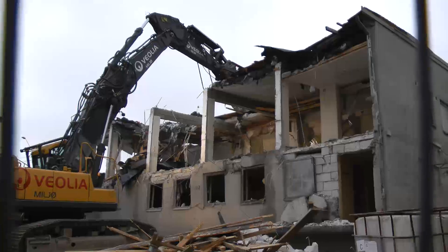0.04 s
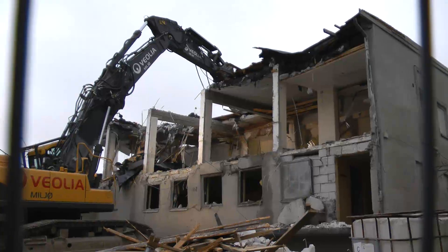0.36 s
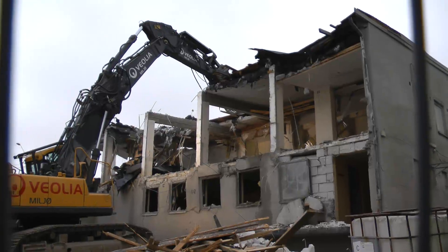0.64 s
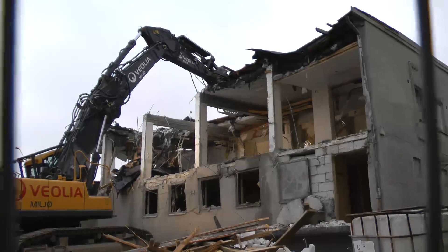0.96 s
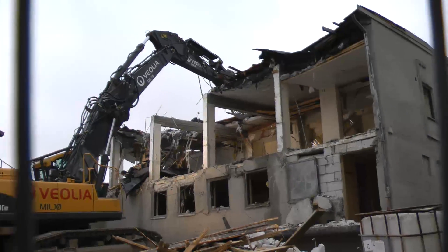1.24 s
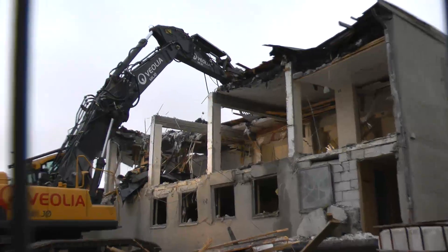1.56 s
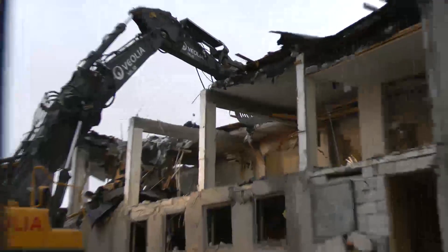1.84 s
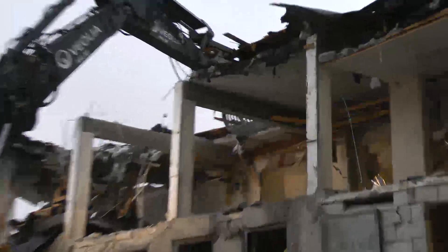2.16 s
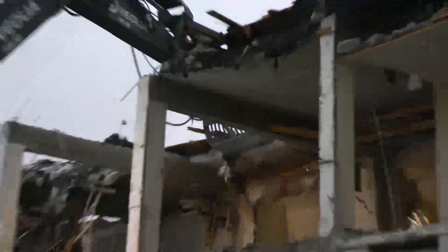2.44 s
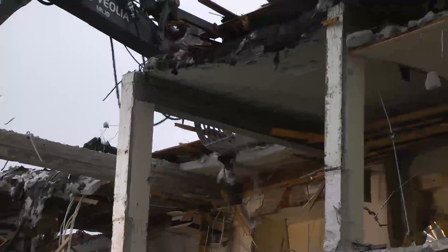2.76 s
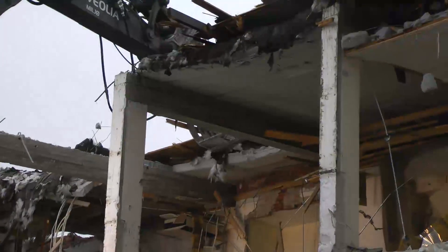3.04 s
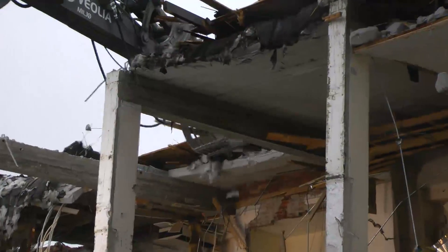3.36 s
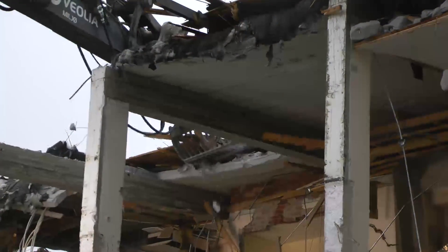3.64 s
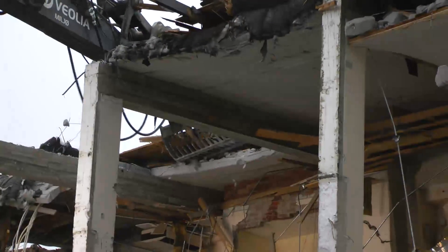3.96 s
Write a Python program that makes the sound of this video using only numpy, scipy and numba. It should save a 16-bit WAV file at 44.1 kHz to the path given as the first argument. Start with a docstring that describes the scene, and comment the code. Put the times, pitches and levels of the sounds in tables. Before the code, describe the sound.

An excavator runs steadily at an outdoor demolition site, its diesel droning under howling, hissing hydraulics. Fine grit starts to trickle, then roof timber snaps in a quick run of sharp cracks with a short echo.

```python
"""A demolition excavator works at steady revs from the start: a six-cylinder diesel drones and booms,
its hydraulic pump howls, fan tones waver and oil sings in two valves over a broad hiss.
From about 2 s, fine grit trickles ever thicker from the roof. At 2.7 s the roof timber starts to snap
in a short run of cracks; the loudest, at 3.2 s, makes a gain control duck the mix and recover.
One last small crack comes at 3.8 s while the machine runs on."""
import sys
import numpy as np
from scipy import signal
from scipy.fft import rfft, irfft
from scipy.io import wavfile
from scipy.ndimage import uniform_filter1d
from numba import njit

SR = 44100
rng = np.random.default_rng(int(sys.argv[2]) if len(sys.argv) > 2 else 0)


def to_wav(sig):
    """Store sig (one row per channel, or 1-D mono) as 16-bit WAV at the path in sys.argv[1].

    Samples outside -1..1 are clipped; the rate is SR.
    """
    pcm = np.clip(np.atleast_2d(sig), -1, 1) * 32767
    pcm = np.round(pcm).astype(np.int16)
    wavfile.write(sys.argv[1], SR, pcm.T)  # frames by channels


N = 176400

# Levels are relative within a layer; a positive pan_db leans left.
# The machine's stereo balance: frequency_hz, pan_db
STEREO_PAN = [(60, -1), (110, -2), (200, -4.5), (380, 1), (700, 7), (1290, 2.5), (2380, 10), (4400, 4),
              (8120, 5.5), (15000, -2)]
# How alike its two sides sound: frequency_hz, likeness_0_to_1
STEREO_LIKENESS = [(25, .2), (65, 0.92), (250, 0.8), (600, 0.74), (1000, 0.36), (1500, 0.5), (2800, 0.46),
                   (5500, 0.92), (9000, 0.83), (14000, 0.98)]
# How far its left side leads: frequency_hz, lead_rad
STEREO_LEAD = [(100, 0.34), (1000, 0.72), (2300, 0.66), (3800, 0.64), (4400, 0.67), (7000, -0.7),
               (8500, -1), (9700, -3), (11000, -6), (14000, 0.2)]
# The diesel's firing rate, sagging under load: time_s, rate_hz
FIRING_RATE = [(0, 84.2), (.45, 84.6), (.68, 84.35), (.9, 83.45), (1.17, 84.15), (1.47, 83.8), (1.78, 84.2),
               (2.02, 85.05), (2.25, 83.9), (2.57, 83.45), (2.9, 84.35), (3.15, 84.15), (3.45, 83.85),
               (3.88, 84.25), (4, 83.9)]
# Tone colour of rumble and clatter: frequency_hz, level_db
RUMBLE_COLOUR = [(25, -41), (45, -24), (62, -15), (80, 2.5), (135, -2), (200, 0.5), (320, -1), (430, -5),
                 (650, -5), (900, -8.5), (1200, -10), (1700, -13.5), (2600, -19), (5000, -79)]
# Engine and pump harmonics: multiple_of_cycle_rate
HARMONICS = [6, 12, 13, 22, 24, 28, 32, 42, 44, 54, 60, 63, 72, 90]
# The mix of those harmonics, row for row: level_db, pan_db
HARMONIC_MIX = [(-42, -4), (-31, -0.5), (-41.5, -4), (-45, 9), (-42, -5), (-42, 10), (-45.5, 4), (-43, -6),
                (-45.5, 2), (-41.5, -0.5), (-51.5, 6), (-51.5, 14), (-48.5, 13), (-49, 12)]
# Fader on the whole diesel drone: time_s, level_db
DRONE_FADER = [(0, 2), (1.2, -0.5), (2.0, 0), (2.8, -1.5), (3.4, -1.5), (4, -0.3)]
# Fader on the exhaust boom: time_s, level_db
BOOM_FADER = [(0, -41), (.3, -26.5), (.8, -29), (1.7, -28.5), (2.1, -31.5), (2.6, -30), (3.1, -32.5),
              (3.6, -35), (4, -33)]
# Swells of the pump's howl: time_s, level_db
HOWL_FADER = [(0, -33), (.3, -38.5), (.55, -32), (.76, -29), (.87, -22), (1.02, -25.5), (1.08, -47),
              (1.14, -29.5), (1.43, -24), (1.7, -31.5), (1.84, -27.5), (2.08, -29), (2.45, -26),
              (2.74, -24.5), (2.9, -31), (3.15, -31), (3.35, -26.5), (3.53, -25), (3.9, -28), (4.0, -31)]
# The pump's hum, an octave under the howl: time_s, level_db
HUM_FADER = [(0, -27), (.6, -39.5), (.85, -46), (1.2, -34), (1.6, -45), (3, -39), (4, -38)]
# Fan and auxiliary drive tones: pitch_hz, level_db
FAN_TONES = [(109.5, -40), (136, -38.5), (328.4, -38.5), (358.5, -44.5), (548, -49.5), (2303, -54),
             (3053, -53.5)]
# Tone colour of the hiss: frequency_hz, level_db
HISS_COLOUR = [(700, -17.5), (1500, -12.5), (1950, -7.5), (2250, -0.24), (3200, 1.5), (4200, -0.2),
               (4800, 0.5), (5900, 0.2), (6650, 0.4), (7250, -4), (7700, -5), (8300, -10.5), (9400, -5.5),
               (9900, -17.5), (10700, -32.5), (14500, -21), (16000, -42)]
# Fader on the hiss: time_s, level_db
HISS_FADER = [(0, 1.5), (.6, 2.5), (.9, 0.7), (1.4, 1.5), (2.4, 1.5), (2.9, 1.4), (3.5, 2.2), (4, 1.5)]
# The lower valve note, rising: time_s, pitch_hz, level_db
RISING_VALVE = [(0, 2800, -31), (.6, 2975, -42), (1.0, 3050, -38), (1.35, 3380, -32), (2.3, 3320, -36),
                (2.9, 3214, -36), (3.5, 3400, -34), (4, 3390, -37)]
# The upper valve note, sinking and swelling: time_s, pitch_hz, level_db
SINKING_VALVE = [(0, 5880, -49), (1.1, 5900, -35), (1.55, 5645, -35), (2.3, 5850, -39), (2.85, 5630, -31),
                 (3.3, 5580, -34), (3.75, 5440, -30.5), (4, 5500, -31)]
# Grit building as the roof gives way: time_s, level_db
GRIT_FADER = [(0, -80), (2.1, -53), (2.8, -44), (3.3, -42), (3.6, -46), (3.92, -39), (4, -36)]
# Cue list of timber snaps: start_s, level_db, thick_wood_db, brightness_db, pitch_ratio
SNAP_CUES = [(2.694, -27, 1, -8, 0.96), (3.054, -16, 4.5, -6, 1.02), (3.1225, -18, 5, -3, 1.04),
             (3.2076, -7.5, -0.5, -6.5, 0.976), (3.263, -14, -4, -8, 0.98), (3.289, -16, 2, -3, 1.027),
             (3.335, -20, -2, 0, 0.84), (3.771, -23, 1, -6, 0.98)]
# The stages in which each snap tears: delay_s, level_db, knock_db, splinters_db
TEAR_STAGES = [(0, 1, -7, 2), (.0015, 3, 2.5, -11), (.0036, 3.5, 0, -7), (.0085, -0.5, 1.5, 2),
               (.0158, -7, 0, 10)]
# The wood's ring, before each snap retunes it: pitch_hz, level_db, t60_s
WOOD_MODES = [(480, -5, 0.023), (741, -4, 0.045), (805, -2.5, 0.029), (1060, -10.5, 0.017),
              (1410, -0.5, 0.015), (1650, -13, 0.011), (2020, -2.5, 0.024), (2410, 0.5, 0.011),
              (2726, 2.5, 0.017), (3600, -1, 0.012), (5200, -1, 0.0087)]

CYLINDERS, PUMP_PULSES = 6, 36  # firings and piston pulses in one two-turn engine cycle


def undb(db):
    """Decibels to gain."""
    return 10 ** (np.asarray(db) / 20)


def unit(x):
    """Scale to rms 1."""
    return x / np.sqrt(np.mean(x ** 2))


def curve(rows):
    """An automation curve at every sample."""
    return np.interp(np.arange(N) / SR, *np.array(rows).T)


def bins():
    """Frequencies of the spectrum in Hz, floored at 1."""
    return np.maximum(np.arange(N // 2 + 1) * SR / N, 1)


def across(rows):
    """A table drawn across the spectrum on a log-frequency axis."""
    hz, value = np.array(rows).T
    return np.interp(np.log(bins()), np.log(hz), value)


def drift(rate_hz):
    """Smooth random modulation of rms 1."""
    spectrum = rfft(rng.standard_normal(N)) * np.exp(-(bins() / rate_hz) ** 2)
    spectrum[0] = 0
    return unit(irfft(spectrum, N))


def noise():
    """Two unrelated white noises."""
    return rng.standard_normal((2, N))


def low_cut(x, hz):
    """Roll off the lows at 12 dB an octave."""
    return signal.sosfilt(signal.butter(2, hz, "high", fs=SR, output="sos"), x)


def pan(x, db):
    """Place a sound between left and right."""
    return x * undb(np.array([[db], [-db]]) / 2)


def spread(sounds, colour_db):
    """Colour a direct and a scattered sound and give them the machine's stereo image, at rms 1."""
    direct, scattered = rfft(sounds) * undb(colour_db)
    alike = np.clip(across(STEREO_LIKENESS), 0, 1)
    sides = np.array([[1], [-1]])
    pair = direct * np.sqrt(1 + alike) + sides * scattered * np.sqrt(1 - alike)
    panned = pair * undb(sides * across(STEREO_PAN) / 2)
    return unit(irfft(panned * np.exp(.5j * sides * across(STEREO_LEAD)), N))


def diesel(cycle, clatter_db=-32, rumble_db=-27.5, throb=0.14, waver_db=1.5, wobble_rad=0.3):
    """Clatter loops every engine cycle, exhaust rumble pulses with the firings, harmonics drone."""
    grid = np.arange(4096) / 4096
    clatter = np.array([np.interp(cycle % 1, grid, rng.standard_normal(len(grid))) for _ in range(2)])
    colour = across(RUMBLE_COLOUR)
    drone = undb(clatter_db) * spread(clatter * undb(waver_db * drift(6.3)), colour)
    firing = np.cos(2 * np.pi * CYLINDERS * cycle)
    drone += undb(rumble_db) * spread(noise() * (1 + throb * firing), colour)
    for multiple, (level_db, pan_db) in zip(HARMONICS, HARMONIC_MIX):
        phase = 2 * np.pi * (multiple * cycle + rng.random()) + wobble_rad * drift(7.8)
        tone = np.sqrt(2) * np.sin(phase)
        drone += pan(tone * undb(level_db + waver_db * drift(10.2)), pan_db)
    return drone * undb(curve(DRONE_FADER))


def exhaust_boom(cycle, pitch_hz=151.3, width_hz=66, throb=0.51, surge_db=1.5):
    """Exhaust puffs ring the muffler's low resonance in uneven surges."""
    muffler_db = -20 * np.log10(1 + (2 * (bins() - pitch_hz) / width_hz) ** 4)
    puffs = noise() * (1 + throb * np.cos(2 * np.pi * CYLINDERS * cycle))
    surging = spread(puffs, muffler_db) * undb(surge_db * drift(12))
    return unit(surging) * undb(curve(BOOM_FADER))


def hydraulic_pump(cycle, howl_trim_db=2, howl_pan_db=3, howl_flutter_db=0.4, hum_flutter_db=2):
    """The pump's piston ripple hums and howls, swelling with the pressure."""
    phase = 2 * np.pi * PUMP_PULSES * cycle
    howl = np.sin(phase) * undb(curve(HOWL_FADER) + howl_trim_db + howl_flutter_db * drift(22))
    hum = np.sin(phase / 2 + 2 * np.pi * rng.random())
    hum *= undb(curve(HUM_FADER) + hum_flutter_db * drift(25))
    return np.sqrt(2) * (pan(howl, howl_pan_db) + hum)


def fan(detune=0.0041, waver_db=3):
    """The cooling fan and auxiliary drives spin out tones that waver in pitch and level."""
    tones = 0
    for pitch_hz, level_db in FAN_TONES:
        turns = np.cumsum(pitch_hz * (1 + detune * drift(8.7))) / SR
        tone = np.sqrt(2) * np.sin(2 * np.pi * (turns + rng.random()))
        tone *= undb(level_db + waver_db * drift(3.6))
        tones += pan(tone, np.interp(pitch_hz, *np.array(STEREO_PAN).T))
    return tones


def hiss(trim_db=-23.5, flicker_db=.5, ripple_db=1.7):
    """A broad bed of rushing air and oil, its spectrum rippled by reflections."""
    ripple = unit(uniform_filter1d(rng.standard_normal(N // 2 + 1), size=160))
    bed = spread(noise(), across(HISS_COLOUR) + ripple_db * ripple)
    return bed * undb(trim_db + curve(HISS_FADER) + flicker_db * drift(28))


def valve(rows, width_hz, flicker_db=1.5, wander=.008):
    """Oil sings through a valve in a narrow noise band whose centre glides with the flow."""
    rows = np.array(rows)
    centre_hz = curve(rows[:, [0, 1]]) * (1 + wander * drift(8))
    rolloff = np.sqrt(1 + (2 * np.fft.fftfreq(N, 1 / SR) / width_hz) ** 4)
    band = np.fft.ifft(np.fft.fft(noise() + 1j * noise()) / rolloff)
    singing = np.real(band * np.exp(2j * np.pi * np.cumsum(centre_hz) / SR))  # shifted up to pitch
    return spread(singing, 0) * undb(curve(rows[:, [0, 2]]) + flicker_db * drift(10))


def grit(grains_per_s=2000, scatter_db=2.5, decay_s=.0006, low_cut_hz=5000, crossfeed=0.33):
    """Tiny grains of falling mortar tick so densely that they blend into the hiss."""
    grains = (rng.random(N) < grains_per_s / SR) * undb(scatter_db * rng.standard_normal(N))
    decay = np.exp(-np.arange(SR // 100) / (SR * decay_s))
    fizz = noise()
    ticks = (fizz + crossfeed * fizz[::-1]) * signal.fftconvolve(grains, decay)[:N]
    return unit(low_cut(ticks, low_cut_hz)) * undb(curve(GRIT_FADER))


def wood_ring(age_s, pitch_ratio, body_db, body_below_hz=1100, detune=0.025):
    """Torn wood rings in short modes; the low ones give the hollow knock."""
    ring = 0
    for mode_hz, level_db, t60_s in WOOD_MODES:
        gain = undb(level_db + body_db * (mode_hz < body_below_hz)) * rng.choice([-1, 1])
        pitch_hz = mode_hz * pitch_ratio * (1 + detune * rng.standard_normal())
        ring += gain * np.exp(-np.log(1000) * age_s / t60_s) * np.sin(2 * np.pi * pitch_hz * age_s)
    return ring


def timber(timing_scatter=0.104, splinter_db=7.5, splinter_s=0.0021, low_cut_hz=330, high_cut_hz=5900):
    """Each snap is a few quick tears, each a bright burst of splinters over a knock of the wood."""
    t = np.arange(SR // 5) / SR
    cracks = np.zeros((2, N + len(t)))
    high_cut = signal.butter(1, high_cut_hz, fs=SR, output="sos")
    for start_s, level_db, thick_db, bright_db, pitch_ratio in SNAP_CUES:
        snap = np.zeros(len(t))
        for delay_s, tear_db, knock_db, split_db in TEAR_STAGES:
            onset_s = delay_s * (1 + timing_scatter * rng.standard_normal())
            age_s = np.maximum(t - onset_s, 0)
            ring = wood_ring(age_s, pitch_ratio, thick_db + knock_db)
            burst = rng.standard_normal(len(t)) * np.exp(-age_s / splinter_s)
            splinters = undb(splinter_db + bright_db + split_db) * burst
            snap += undb(tear_db) * (t >= onset_s) * (ring + splinters)
        snap = signal.sosfilt(high_cut, low_cut(snap, low_cut_hz))
        peak_rms = np.sqrt(uniform_filter1d(snap ** 2, size=220).max())  # loudest 5 ms
        start = int(start_s * SR)
        cracks[:, start:start + len(t)] += snap * undb(level_db) / peak_rms
    return cracks[:, :N]


def building_echo(sound, wet_db=-4.5, t60_s=0.35):
    """The shell of the building throws back a short, diffuse tail."""
    tail = noise() * np.exp(-np.log(1000) * np.arange(N) / SR / t60_s)
    echo = signal.fftconvolve(sound, unit(tail) / np.sqrt(N), axes=1)[:, :N]
    return sound + undb(wet_db) * echo


def scene():
    """One shaft drives engine and pump; the roof breaks over them."""
    cycle = np.cumsum(curve(FIRING_RATE)) / CYLINDERS / SR  # engine cycles elapsed
    valves = valve(RISING_VALVE, width_hz=230) + valve(SINKING_VALVE, width_hz=480)
    machine = diesel(cycle) + exhaust_boom(cycle) + hydraulic_pump(cycle) + fan() + hiss() + valves
    return machine + building_echo(timber()) + grit()


@njit
def ducking(over_db, attack_s, hold_s, release_s):
    """Gain reduction in dB that grabs a peak, holds it and lets go."""
    reduction_db = np.empty(len(over_db))
    peak_db, cut_db, wait_s = 0., 0., 0.
    for i in range(len(over_db)):
        wait_s -= 1 / SR
        if over_db[i] > peak_db:
            peak_db, wait_s = over_db[i], hold_s
        elif wait_s < 0:
            peak_db -= peak_db / (release_s * SR)
        cut_db += (peak_db - cut_db) / (attack_s * SR)
        reduction_db[i] = cut_db
    return reduction_db


def record(dry, threshold_db=-18, sidechain_hz=590, ceiling=.75, top_hz=15800):
    """A gain control keyed on mids and treble ducks the mix; peaks are rounded and the top is cut."""
    sidechain = low_cut(dry, sidechain_hz)
    power = uniform_filter1d(np.mean(sidechain ** 2, axis=0), size=220)
    over_db = np.maximum(10 * np.log10(np.abs(power) + 1e-12) - threshold_db, 0)
    ducked = dry * undb(-ducking(over_db, attack_s=0.0033, hold_s=0.017, release_s=0.17))
    rounded = ducked / (1 + (ducked / ceiling) ** 6) ** (1 / 6)
    return signal.sosfilt(signal.ellip(10, .1, 90, top_hz, fs=SR, output="sos"), rounded)


dry = scene()
out = record(dry)
to_wav(out)
```